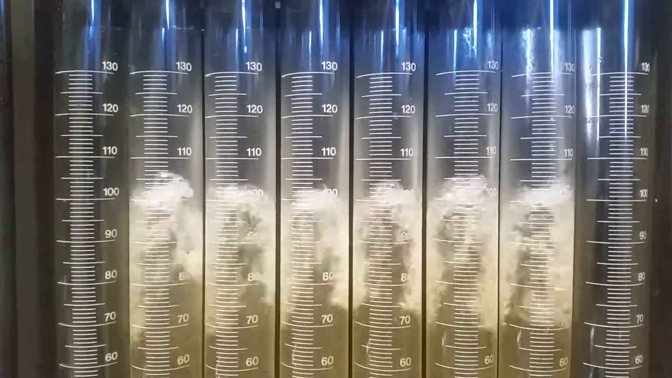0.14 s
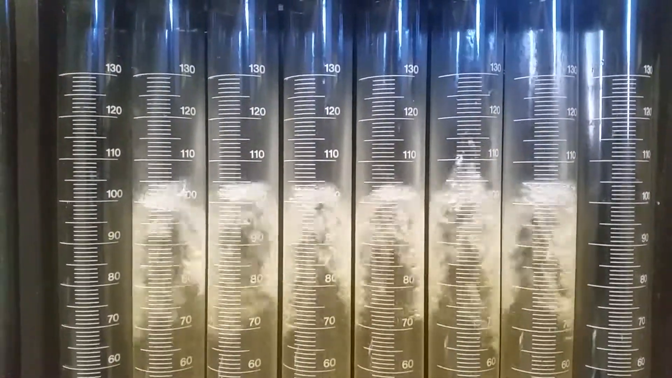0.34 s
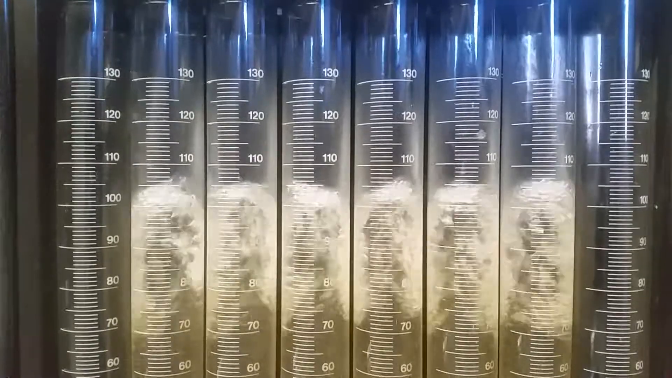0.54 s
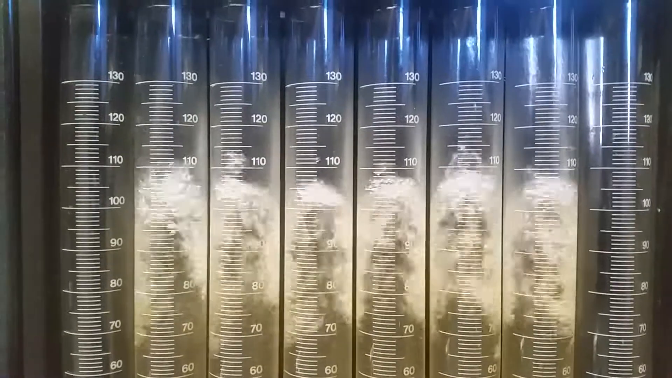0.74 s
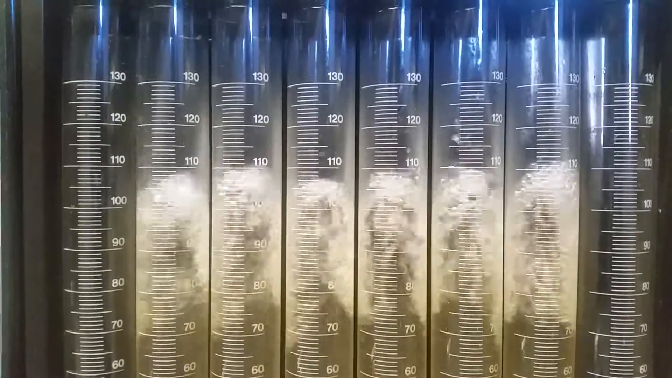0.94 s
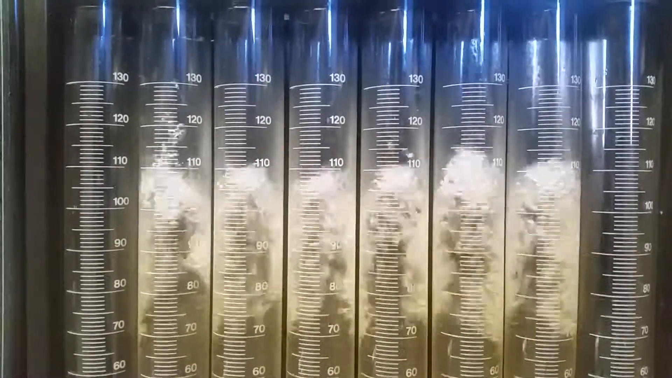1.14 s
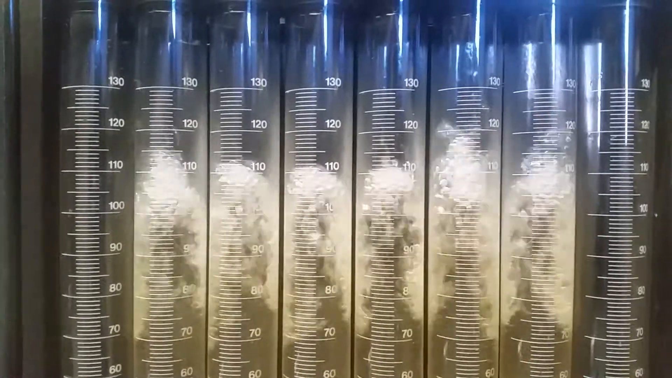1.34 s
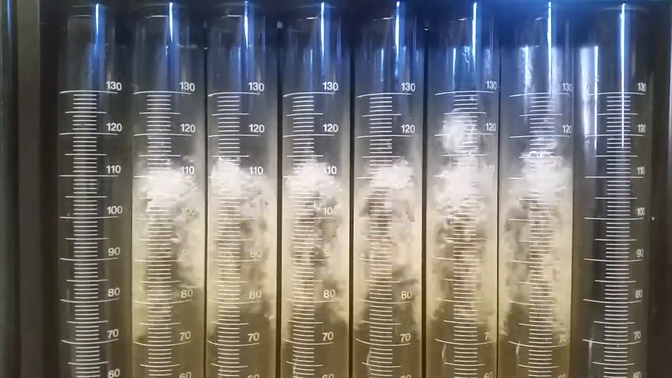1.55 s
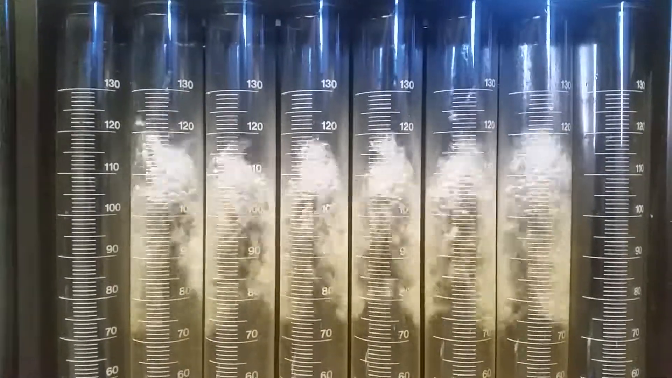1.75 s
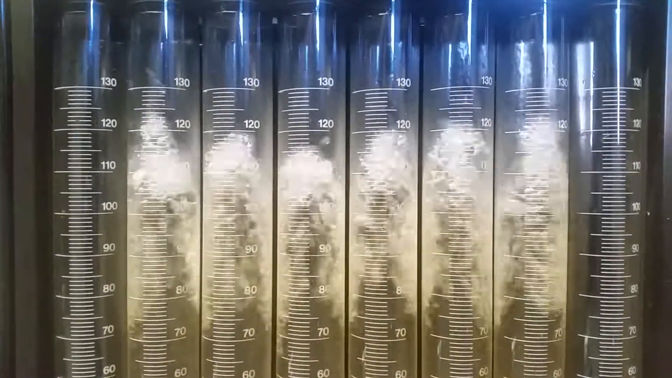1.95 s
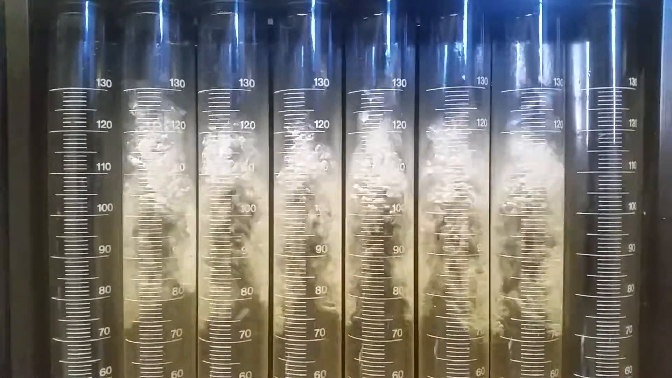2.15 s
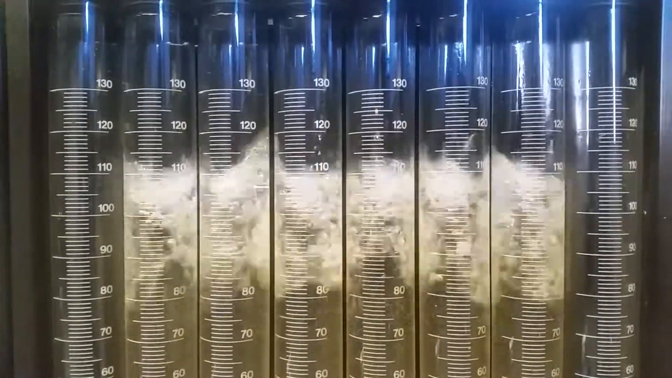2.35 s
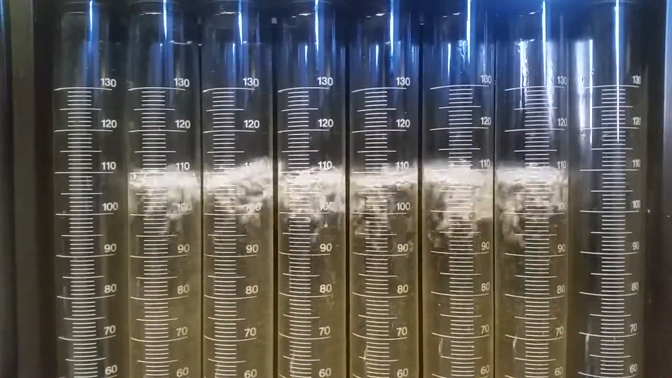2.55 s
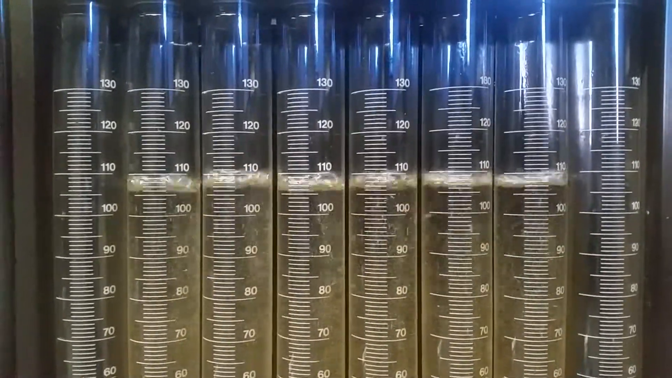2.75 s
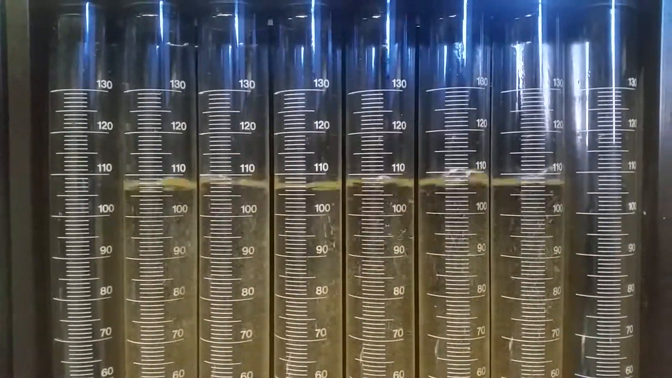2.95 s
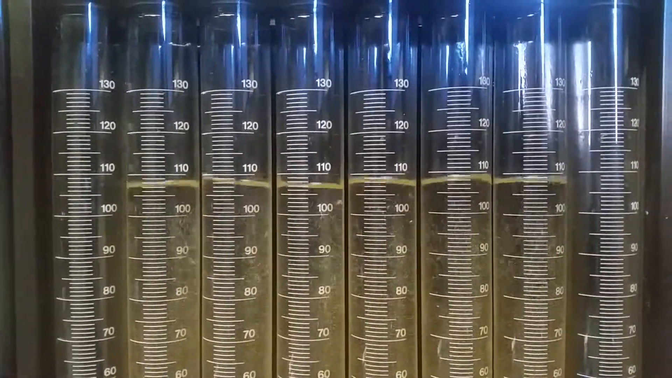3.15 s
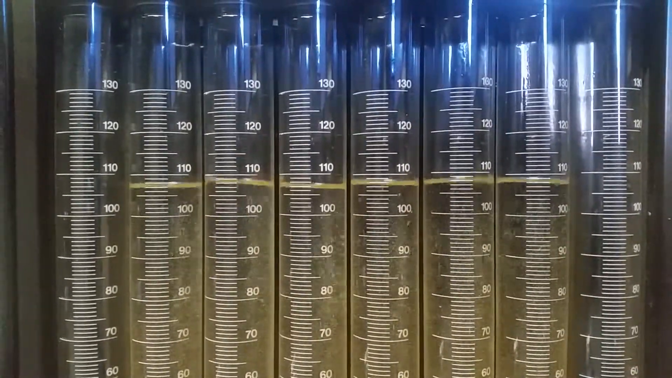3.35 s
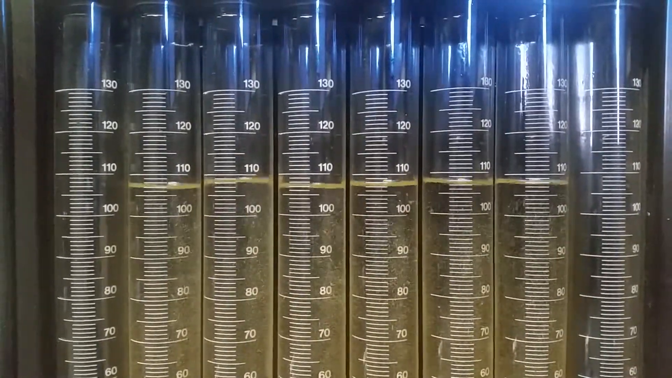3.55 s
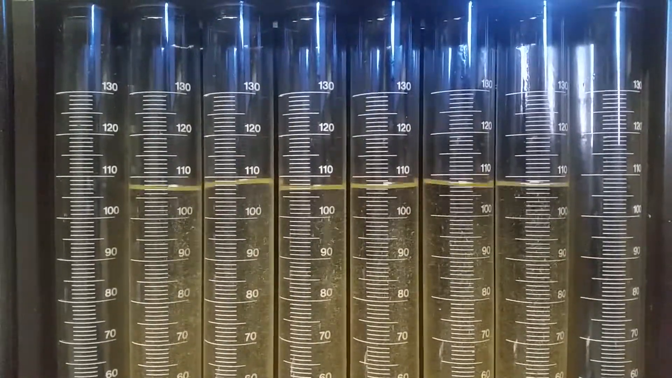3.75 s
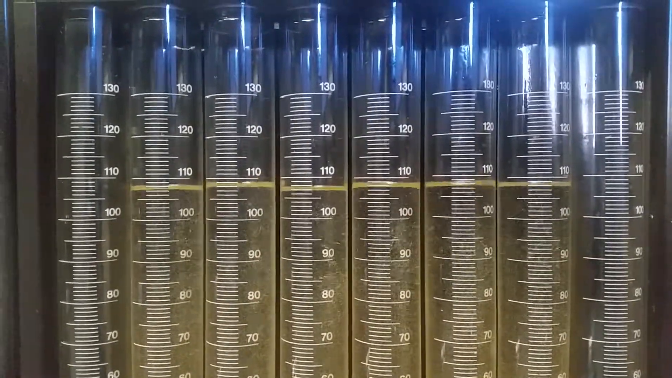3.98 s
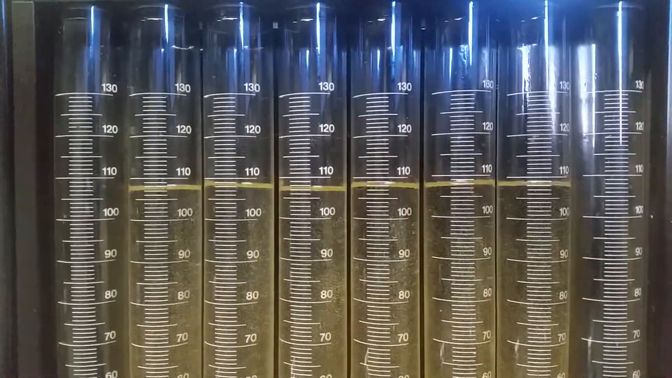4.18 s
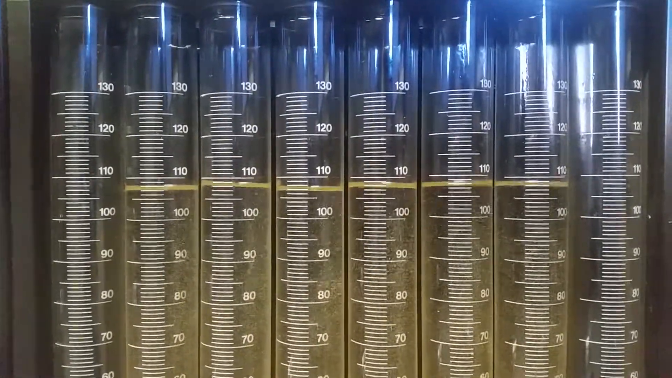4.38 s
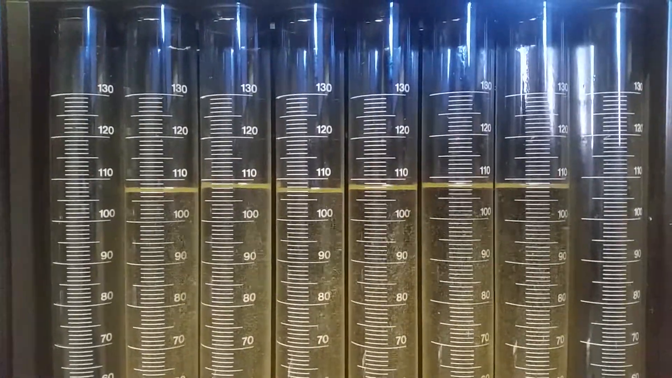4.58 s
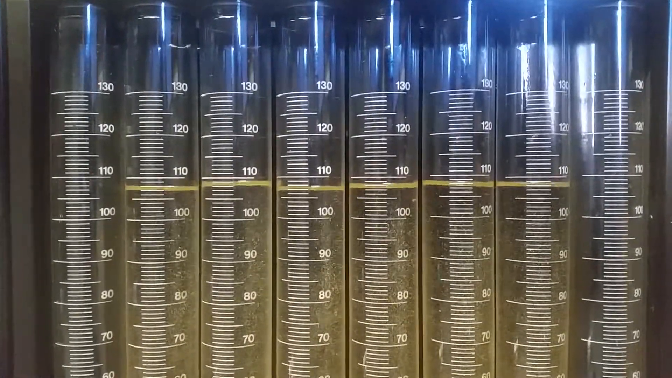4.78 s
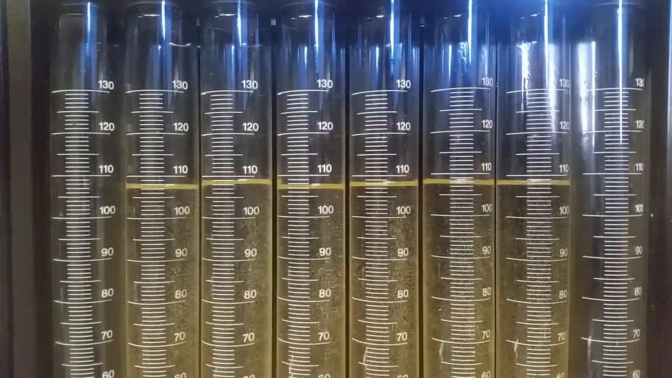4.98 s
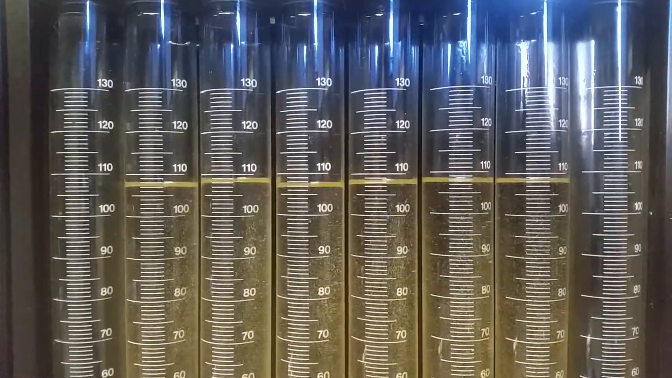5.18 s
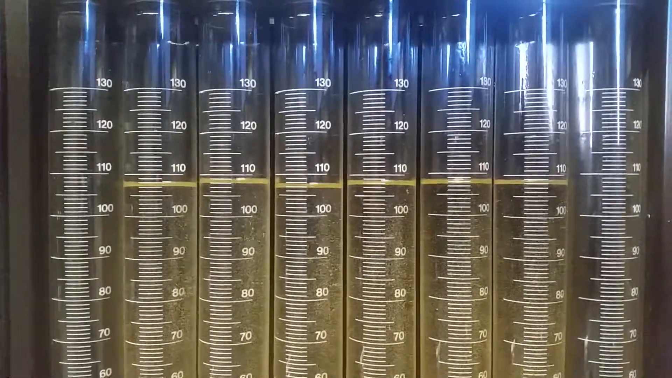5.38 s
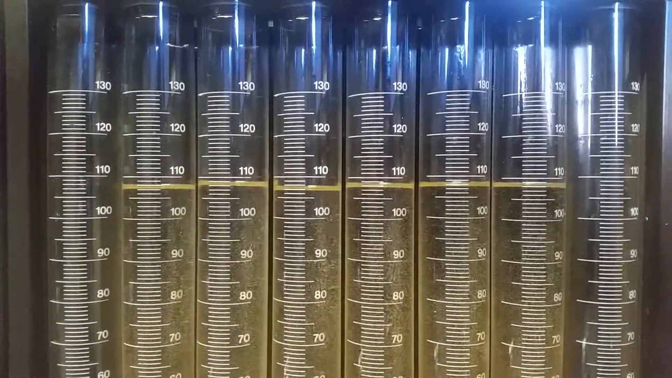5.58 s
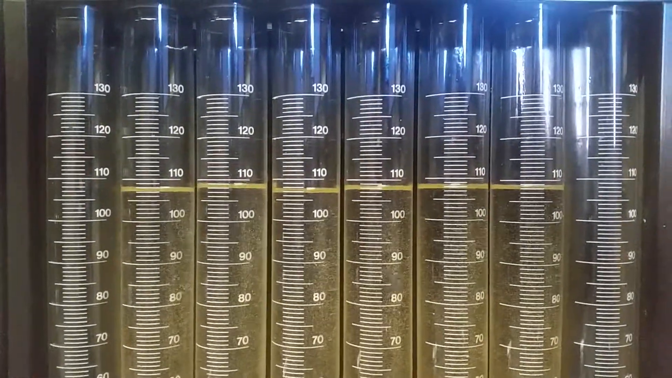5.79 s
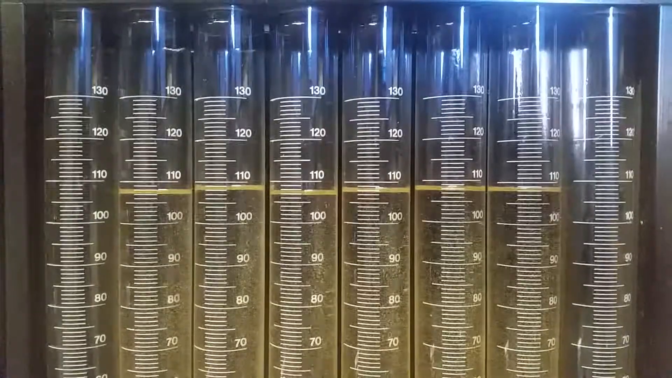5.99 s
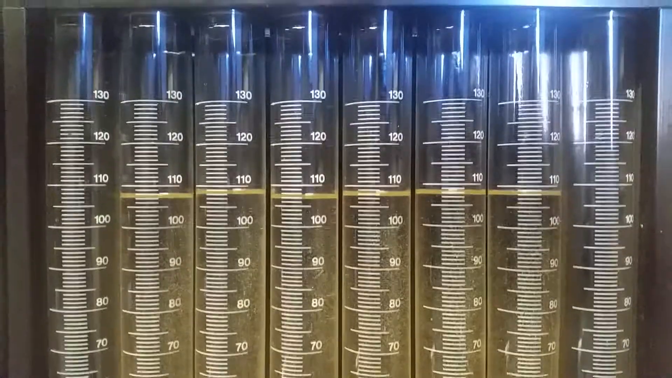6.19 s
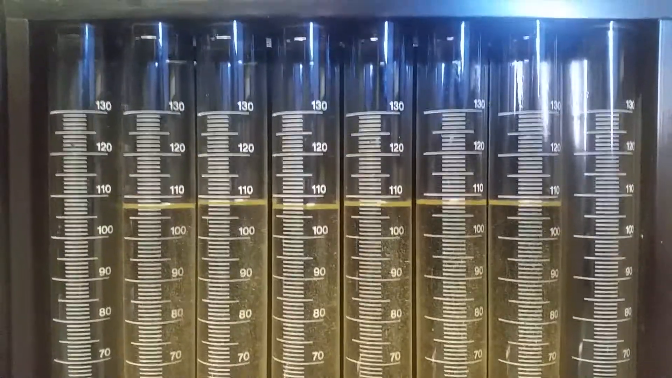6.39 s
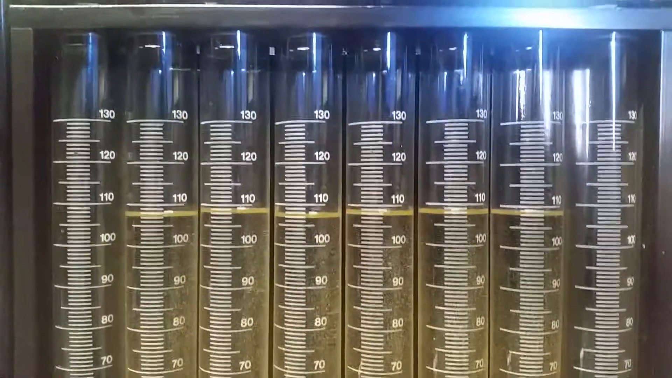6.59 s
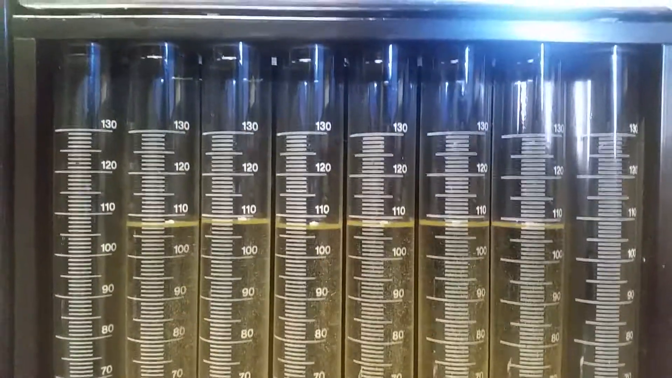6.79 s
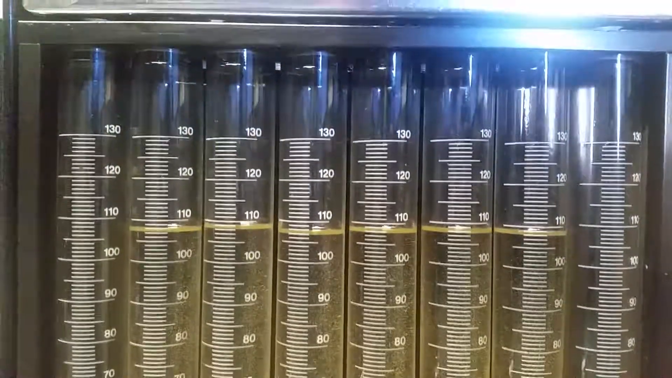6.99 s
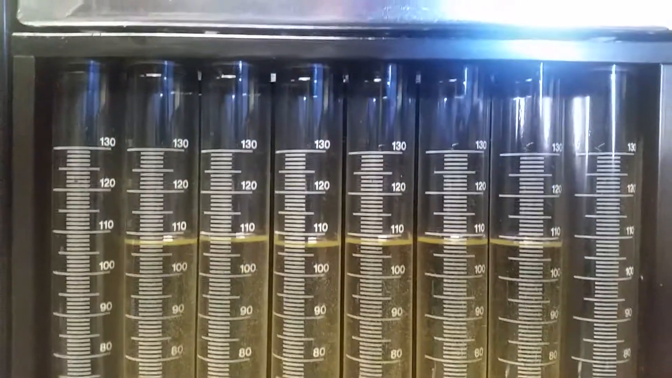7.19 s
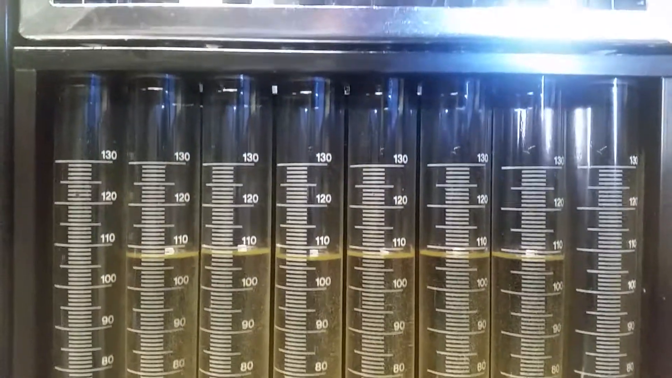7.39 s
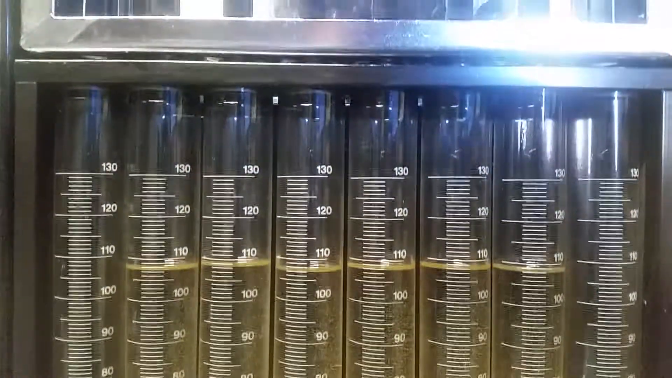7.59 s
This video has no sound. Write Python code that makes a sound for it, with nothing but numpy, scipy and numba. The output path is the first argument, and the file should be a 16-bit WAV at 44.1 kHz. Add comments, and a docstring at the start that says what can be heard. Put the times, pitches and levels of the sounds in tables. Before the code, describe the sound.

Close up, injectors spray fluid into glass cylinders with a dense, bright, glassy hiss, slightly rising in pitch, while a pump whines and drones beneath. After about two seconds the valves snap shut with a sharp metallic crack, followed by brief sputters, knocks and a shuddering pump stop. A low workshop fan hum and rumble continue, with faint dull handling bumps near the end. The spray sits strongly on the left.

```python
"""Fuel injector test bench

Injectors spray into glass cylinders near the left microphone; the right one is shaded. The jets are noise in
resonances of glass and cabinet, with air columns that rise in pitch as they fill; a nine-vane pump whines in
shaft-order sines. The valves snap shut as decaying modes and cracks, puffs of noise and ringing knocks follow,
and the pump stops. Fan and hum sines, a noise rumble and dull bumps on the right go on."""
import sys
import numpy as np
from scipy import signal
from scipy.fft import rfft, irfft, next_fast_len
from scipy.io import wavfile
from scipy.ndimage import uniform_filter1d
from numba import njit

SR = 44100
rng = np.random.default_rng(int(sys.argv[2]) if len(sys.argv) > 2 else 0)


def to_wav(sig):
    """Store sig (one row per channel, or 1-D mono) as 16-bit WAV at the path in sys.argv[1].

    Samples outside -1..1 are clipped; the rate is SR.
    """
    pcm = np.clip(np.atleast_2d(sig), -1, 1) * 32767
    pcm = np.round(pcm).astype(np.int16)
    wavfile.write(sys.argv[1], SR, pcm.T)  # frames by channels


N = 336483
T = np.arange(N) / SR

CLOSE_S = 2.3183  # the valves close
# right microphone against left for nearby sounds: (f/Hz, level/dB)
SHADE = [(100, -1), (300, -3), (1000, -13), (2500, -28), (5000, -26), (12000, -20)]


def undb(db):
    """Amplitude gain for a level in dB."""
    return 10 ** (np.asarray(db) / 20)


def along(table, hz, axis):
    """One column of a table, read on a log-frequency axis."""
    rows = np.array(table)
    return np.interp(np.log(hz), np.log(rows[:, 0]), rows[:, axis])


def shaded_pair(hz):
    """Left and right gains of a nearby sound at this frequency."""
    return undb([[0], [along(SHADE, hz, axis=1)]])


@njit
def svf(x, hz, width):
    """State-variable band-pass with a moving centre, gain 1 there."""
    y, band, low = np.empty(len(x)), 0., 0.
    for i in range(len(x)):
        g, k = np.tan(np.pi * hz[i] / SR), width / hz[i]
        v = (band + g * (x[i] - low)) / (1 + g * (g + k))
        band, low, y[i] = 2 * v - band, low + 2 * g * v, k * v
    return y


def walk(rate, size=N):
    """Random levels held 1 / rate s and slewed twice; spread near 1."""
    hold = int(SR / rate)
    steps = np.repeat(rng.standard_normal(size // hold + 1), hold)
    smooth = uniform_filter1d(uniform_filter1d(steps, hold), hold)
    return np.sqrt(2) * smooth[:size]


def ringing_noise(hz, width):
    """Noise of rms 1 through two equal band-passes, each of the given width in Hz."""
    once = svf(rng.standard_normal(len(hz)), hz, 1. * width)
    x = svf(once, hz, 1. * width)
    return x / x.std()


def diffuse(table, flicker_db, bass_db=0):
    """Stereo noise, most alike in the low mids; each octave band wavers by itself, the treble least."""
    # how the microphones share a sound field: (f/Hz, likeness 0-1, left lead/rad)
    likeness = [(40, 0.65, .1), (100, 0.95, 0.7), (218, 0.98, 0.74), (406, 0.81, 0.97), (905, 0.27, 0.48),
                (1360, 0.78, 2.4), (2980, 0.08, 1.3)]
    size = next_fast_len(N)
    hz = np.maximum(np.arange(size // 2 + 1) * SR / size, 1)
    # scaled to rms 1 in each 1 kHz
    common, separate = rfft(rng.standard_normal((2, size))) * np.sqrt(SR / 2 / 1000)
    like = np.clip(along(likeness, hz, axis=1), 0, 1)
    lagged = common * np.exp(-1j * along(likeness, hz, axis=2))
    right = like * lagged + np.sqrt(1 - like ** 2) * separate
    pair = np.array([common * undb(along(table, hz, axis=1)), right * undb(along(table, hz, axis=-1))])
    octave = np.clip(np.log2(hz / 50), 0, 7)
    out = 0
    for k in range(8):
        band = irfft(pair * np.clip(1 - abs(octave - k), 0, 1), size)[:, :N]
        level_db = flicker_db * (1 - k / 10) * walk(6) + bass_db * (k < 4)
        out = out + band * undb(level_db)
    return out


def tones(turns, rows, waver_db):
    """Sine partials of a rotation given in turns, each wavering a little around its rms level."""
    out = 0
    for multiple, left_db, right_db, lead in rows:
        phase = 2 * np.pi * (multiple * turns + rng.random())
        size = np.sqrt(2) * undb(waver_db * walk(3, size=len(turns)))
        pair = np.array([undb(left_db) * np.sin(phase), undb(right_db) * np.sin(phase - lead)])
        out = out + size * pair
    return out


def jets():
    """Turbulent hiss in fixed and rising resonances; after closing a quick fall leaves a longer tail."""
    # resonances of glass and cabinet: (f/Hz, width per filter pass/Hz, level/dB)
    cabinet = [(1200, 1300, -53.5), (1710, 550, -49.5), (2630, 90, -54.5), (3216, 560, -44.5),
               (3797, 160, -45.5), (4464, 250, -45), (4770, 270, -37), (5100, 350, -39.5), (5540, 370, -36),
               (5880, 250, -38), (6140, 220, -40.5), (6600, 990, -42), (6880, 270, -43), (7440, 500, -43),
               (7790, 190, -44), (8290, 710, -37), (9000, 690, -40), (9700, 1700, -41.5),
               (10370, 540, -45.5), (12740, 500, -50.5)]
    # air columns over the fuel, at the first moment: (f/Hz, width per filter pass/Hz, level/dB, slope/dB per s)
    columns = [(471, 51, -43, -5), (2012, 430, -46.5, 1), (3594, 220, -45, 1), (3880, 330, -48, 3.5)]
    # even hiss under the resonances, left: (f/Hz, level in 1 kHz/dB)
    even_hiss = [(2600, -77), (3000, -49.5), (5500, -40), (6400, -53), (8300, -45), (10400, -48),
                 (11100, -46), (12800, -49), (13500, -48), (15700, -51)]
    # hiss that reaches the right microphone: (f/Hz, level in 1 kHz/dB)
    shaded_hiss = [(1000, -62), (2200, -57.5), (2600, -71), (4300, -65.5), (4600, -71), (4800, -63),
                   (6000, -57), (6600, -58), (8300, -59), (10300, -65.5), (15500, -71)]
    # quick fall of the resonances after closing: (f/Hz, t60/s)
    jet_tail = [(1000, 0.63), (2400, 0.15), (5000, 0.12), (9000, 0.033), (15000, 0.054)]
    column_rise = 0.19  # share by which filling raises the pitch
    t = T[:3 * SR]
    filled = np.minimum(t / CLOSE_S, 1)
    rise = 1 / (1 - column_rise / (1 + column_rise) * filled)  # pitch goes as 1 / column length
    froth_db = .6 * walk(9, size=len(t))  # shared by all resonances
    resonances = 0
    for modes, glide in ((cabinet, np.ones(len(t))), (columns, rise)):
        for hz, width, db, *slope in modes:
            drift = 1 + 0.0071 * walk(3.16, size=len(t))  # foam keeps retuning the glass
            level_db = db + sum(slope) * t + froth_db + 0.78 * walk(3.9, size=len(t))
            size = undb(level_db) * ring_out(t, along(jet_tail, hz, axis=1))
            # only the low column reaches the right microphone
            shade = shaded_pair(hz) if hz < 1000 else undb([[0], [-60]])
            resonances = resonances + shade * size * ringing_noise(hz * glide * drift, width)
    left = diffuse([(20, -120)] + even_hiss, .6)[0]
    right = diffuse([(20, -120)] + shaded_hiss, .6)[1]
    out = np.array([left, right]) * ring_out(T, 0.036)
    out[:, :len(t)] += resonances
    return out


def ring_out(t, t60):
    """Gain after the valves close: a quick fall, then the workshop's longer tail."""
    echo_db, echo_t60_s = -14, .4
    after = np.maximum(t - CLOSE_S, 0)
    return np.maximum(undb(-60 * after / t60), undb(echo_db - 60 * after / echo_t60_s))


def valves():
    """Each needle cracks on its seat as a noise burst and rings the rail in decaying sines."""
    # needles seating one after another: (t/s, level/dB)
    snaps = [(2.3182, -7), (2.3193, -11), (2.3213, -13), (2.3244, -24)]
    # modes rung by a needle: (f/Hz, level against the snap/dB, t60/s)
    needle_modes = [(2460, -13, 0.016), (3154, -2.5, 0.016), (3900, -4.5, 0.011), (4240, -9, 0.011),
                    (5260, -4, 0.0082), (6440, -9, .008), (12100, -8, 0.0044)]
    crack_db, crack_fade_db_per_s = -6, 1500  # crack against ring; later needles land softer
    out = np.zeros(N)
    ring = T[:SR // 10]
    contact = 1 - np.exp(-ring / .00025)  # the blow takes a moment
    for s, ring_db in snaps:
        i = int(s * SR)
        level_db = ring_db + crack_db - crack_fade_db_per_s * (s - CLOSE_S)
        crack = ringing_noise(np.full(len(ring), 11000.), 14000)
        out[i:i + len(ring)] += contact * undb(level_db - 60 * ring / 0.0053) * crack
        for hz, mode_db, t60 in needle_modes:
            tune = 1 + .015 * rng.standard_normal()
            shape = contact * undb(ring_db + mode_db - 60 * ring / t60)
            out[i:i + len(ring)] += shape * np.sin(2 * np.pi * hz * tune * ring)
    return out * undb([[0], [-22]])


def spurts():
    """Short ragged puffs and gulps of band noise while the rail pressure drains."""
    # last spurts of fuel: (t/s, level/dB, centre f/Hz, width per filter pass/Hz)
    puffs = [(2.342, -42, 5000, 6000), (2.402, -40.5, 5960, 11000), (2.404, -46, 9600, 2000),
             (2.418, -51, 10400, 5000), (2.418, -43, 1300, 1800), (2.449, -42, 2200, 3000),
             (2.449, -46, 6200, 1500), (2.460, -45, 7500, 6000), (2.556, -52, 4900, 600)]
    rise_s, t60_s = 0.0066, 0.19
    sputter_db, sputter_per_s = 2, 300
    out = np.zeros((2, N))
    t = T[:SR // 2]
    for s, db, hz, width in puffs:
        i = int(s * SR)
        fade_db = 60 * np.maximum(t - rise_s, 0) / t60_s
        ragged_db = sputter_db * walk(sputter_per_s, size=len(t))
        shape = np.minimum(t / rise_s, 1) * undb(db - fade_db + ragged_db)
        puff = shape * ringing_noise(np.full(len(t), 1. * hz), width)
        out[:, i:i + len(t)] += puff * shaded_pair(hz)
    return out


def knocks():
    """Pressure surges jerk the fuel line against the bench, which rings briefly in decaying sines."""
    # blows of the line: (t/s, level/dB)
    blows = [(2.318, -42), (2.340, -39), (2.419, -34), (2.449, -39)]
    # bench modes: (f/Hz, level against the blow/dB, t60/s)
    bench_modes = [(190, -1, .12), (430, -5, .2), (640, -1, .09), (920, -5, .08), (1150, -3, .07),
                   (1400, -1, .1), (1710, -2, .07), (1990, -5, .06), (2330, -2, .05), (2760, -6, .05)]
    scatter_db, push_s = 3, .002  # each knock lands elsewhere and favours other modes
    out = np.zeros((2, N))
    ring = T[:SR // 4]
    push = 1 - np.exp(-ring / push_s)
    chance = rng.standard_normal((len(blows), len(bench_modes), 2))
    for (s, db), draws in zip(blows, chance):
        i = int(s * SR)
        for (hz, mode_db, t60), (favour, tune) in zip(bench_modes, draws):
            shape = push * undb(db + mode_db + scatter_db * favour - 60 * ring / t60)
            mode = np.sin(2 * np.pi * hz * (1 + 0.013 * tune) * ring)
            out[:, i:i + len(ring)] += shaded_pair(hz) * shape * mode
    return out


def pump():
    """Shaft orders, vane whine and rushing fuel, until the motor runs down with a shudder."""
    # before the trims below: (multiple of shaft rate, left level/dB, right level/dB, left lead/rad)
    pump_orders = [(1, -60, -64, 0.1), (2, -39, -40, 0.5), (3, -50, -54, 0.8), (4, -47, -51, 0.6),
                   (5, -45, -49, 0.9), (6, -59, -61, 1.0), (8, -52, -66, 1.1), (9, -43, -57, 2.9),
                   (11, -58, -65, 1.2), (12, -58, -69, 0.2), (18, -44, -47, 2.3), (25, -68, -78, -2.3),
                   (26, -72, -67, -2.7), (27, -49, -67, -2.2), (29, -65, -80, 1.2), (33, -64, -89, 1.2),
                   (36, -51, -72, 0.6), (38, -57, -80, 3.1), (45, -51, -72, -2.1), (54, -63, -84, -2.7)]
    # left level drift as the tank empties: multiple -> dB per s squared
    whine_drift = {9: -.5, 18: -1.8, 36: -.5}
    # growth of the left lead: multiple -> rad per s squared
    whine_turn = {18: .22}
    # rushing fuel before its trim: (f/Hz, left level in 1 kHz/dB, right level in 1 kHz/dB)
    rush = [(247, -61, -58), (424, -34, -49), (450, -35.5, -43), (550, -48.5, -55), (754, -33.5, -48),
            (1000, -58.5, -84), (1470, -41, -78)]
    vanes = 9  # orders from here up follow the whine level, those below the motor level
    shaft_hz, sag_hz_per_s = 52.46, .03
    # speed loss and growing rock once the valves close and the motor is cut
    coast_hz_per_s2, coast_db_per_s = 450, 35
    stop_s, stop_db_per_s = 2.44, 600  # from here the orders die away fast
    motor_trim_db, motor_db_per_s = 0.5, -0.5
    whine_trim_db, whine_db_per_s, whine_off_db_per_s = -.5, 0.73, 300
    rush_trim_db, rush_db_per_s, rush_off_db_per_s = -6.5, 1, 300
    # the bench shakes while the rotor slows
    shudder_db, shudder_hz, shudder_width_hz, shudder_rise_s = -35, 160, 140, .08
    t = T[:3 * SR]
    cut, stopped = np.maximum(t - CLOSE_S, 0), np.maximum(t - stop_s, 0)
    hz = np.maximum(shaft_hz - sag_hz_per_s * t - coast_hz_per_s2 * cut ** 2, 0)
    stop_db = -stop_db_per_s * stopped
    motor_db = motor_trim_db + motor_db_per_s * t + coast_db_per_s * cut + stop_db
    whine_db = whine_trim_db + whine_db_per_s * t - whine_off_db_per_s * cut + stop_db
    rush_db = rush_trim_db + rush_db_per_s * t - rush_off_db_per_s * stopped
    turns = np.cumsum(hz) / SR
    emptying = t ** 2 - 1.3
    rushing = diffuse([(20, -100, -100)] + rush + [(4000, -110, -110)], 1.)
    out = rushing[:, :len(t)] * undb(rush_db)
    for k, left_db, right_db, lead in pump_orders:
        drifting_db = left_db + whine_drift.get(k, 0) * emptying
        turning_lead = lead + whine_turn.get(k, 0) * emptying
        order = tones(turns, [(k, drifting_db, right_db, turning_lead)], 0.61)
        out = out + undb(motor_db if k < vanes else whine_db) * order
    shake = np.minimum(cut / shudder_rise_s, 1) * undb(shudder_db - rush_off_db_per_s * stopped)
    out = out + shake * ringing_noise(np.full(len(t), 1. * shudder_hz), shudder_width_hz)
    return np.pad(out, ((0, 0), (0, N - len(t))))


def workshop():
    """Fan orders and hum as sines over a noise rumble whose bass swells slowly."""
    # fan, before the swell: (multiple of fan rate, left level/dB, right level/dB, left lead/rad)
    fan_orders = [(1, -44, -44, 0.1), (2, -52, -52, 0.2), (3, -60, -56, 0.7), (5, -48, -55, 0.9),
                  (7, -48, -52, 0.7), (8, -49, -52, 0.8), (9, -50, -55, 0.8), (10, -55, -56, 0.7),
                  (15, -60, -68, 0.8), (20, -68, -72, 1.9)]
    # mains hum and another motor: (f/Hz, left level/dB, right level/dB, left lead/rad)
    hum = [(120, -47, -44, 1.1), (148, -50, -54, 0.8), (240, -61, -66, 0.8), (297, -56, -57, 1.0),
           (360, -57, -60, 1.0), (898, -63, -69, 0.8)]
    # rumble, before the swell: (f/Hz, left level in 1 kHz/dB, right level in 1 kHz/dB)
    rumble = [(20, -44, -53), (45, -48, -39.5), (105, -37, -41), (160, -35.5, -39.5), (197.5, -26, -29.5),
              (248, -32, -33.5), (268, -31, -36.5), (291, -36, -37), (297, -43.5, -45), (351, -38, -41),
              (422, -43, -48), (463, -47.5, -47.5), (593, -49, -59), (803, -42.5, -53.5), (963, -47, -54),
              (985, -54, -62.5), (1262, -45.5, -60), (1277, -52, -60.5), (5130, -61.5, -79.5),
              (7280, -74.5, -90)]
    # bass swell: (t/s, level/dB)
    swell = [(0, -2.5), (2.5, -0.5), (4, -2), (6, 0), (7.63, -0.5)]
    fan_hz = 28.37
    swell_db = np.interp(T, *np.transpose(swell))
    fan = tones(fan_hz * T, fan_orders, 0.96) * undb(0.28 * swell_db)
    return fan + tones(T, hum, 1.1) + diffuse(rumble + [(12000, -110, -110)], 1.2, swell_db)


def hand():
    """Dull band noise on the right microphone alone, swelling in bumps as from a hand."""
    # bump peaks: (t/s, level/dB)
    bumps = [(0, -53), (5.3, -52), (6.27, -45), (6.76, -42), (7.6, -46)]
    bump_db_per_s = 90  # how fast a bump swells and fades
    fidget_s, fidget_db = 5.9, -57  # from here the hand keeps shifting
    size = sum(undb(db - bump_db_per_s * abs(T - s)) for s, db in bumps)
    size = size + undb(fidget_db - bump_db_per_s * np.maximum(fidget_s - T, 0))
    return ringing_noise(np.full(N, 75.), 70) * size * np.array([[0], [1]])


def scene():
    """The bench at work, its closing and the workshop around it."""
    return jets() + valves() + spurts() + knocks() + pump() + workshop() + hand()


def record(dry):
    """Microphone hiss joins the sound, then a steep low-pass cuts the top."""
    # hiss at both microphones: (f/Hz, level in 1 kHz/dB)
    mic_hiss = [(1000, -69), (5000, -82.5), (8000, -75), (16000, -76)]
    top_hz = 15740
    hiss = diffuse([(20, -100)] + mic_hiss, 0)
    low_pass = signal.ellip(12, .2, 80, top_hz, fs=SR, output="sos")
    return signal.sosfilt(low_pass, dry + hiss)


dry = scene()
out = record(dry)
to_wav(out)
```